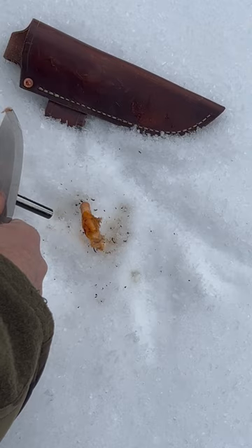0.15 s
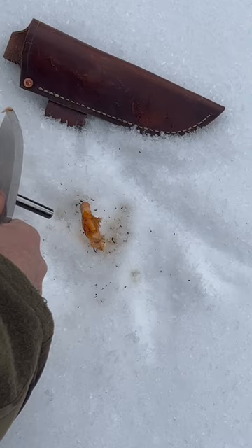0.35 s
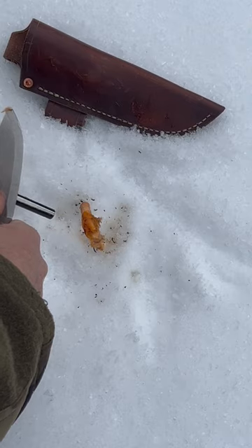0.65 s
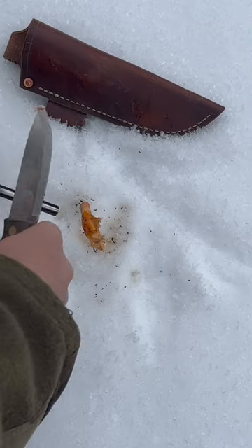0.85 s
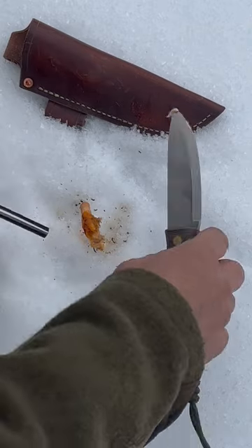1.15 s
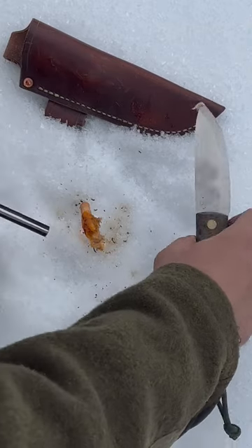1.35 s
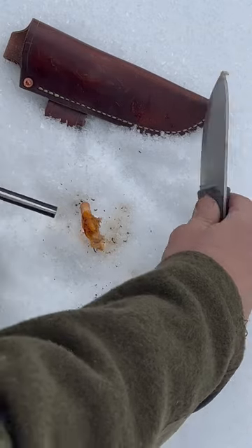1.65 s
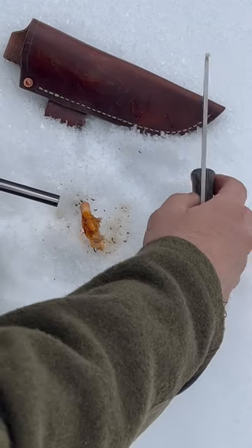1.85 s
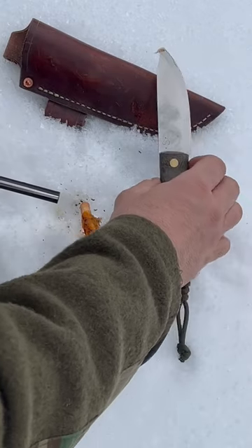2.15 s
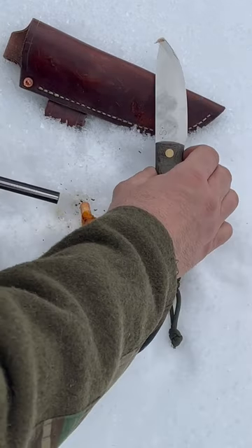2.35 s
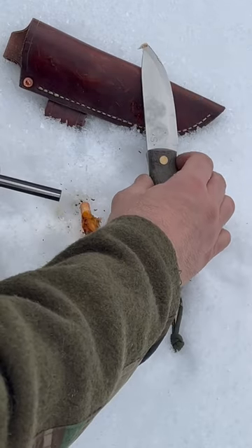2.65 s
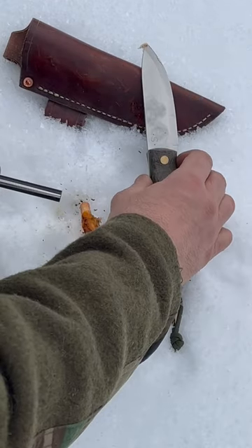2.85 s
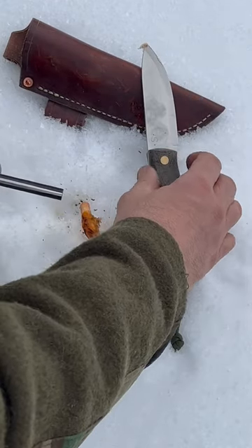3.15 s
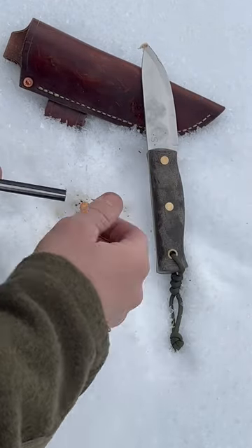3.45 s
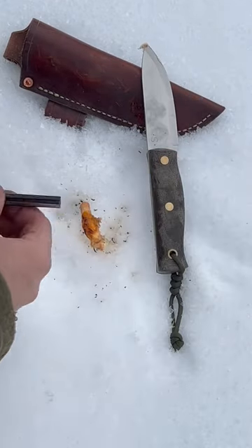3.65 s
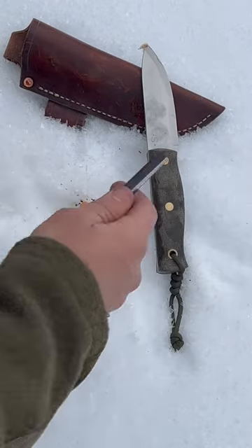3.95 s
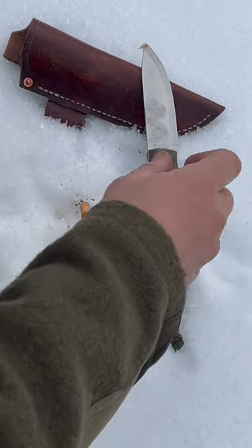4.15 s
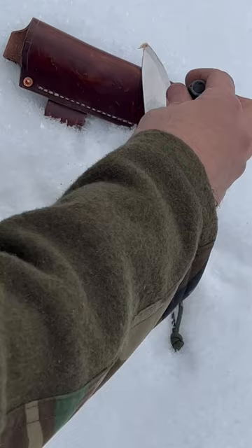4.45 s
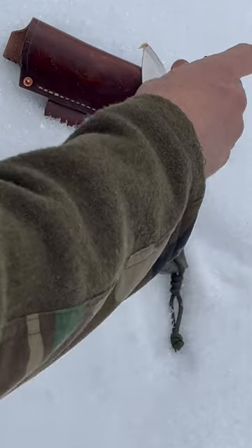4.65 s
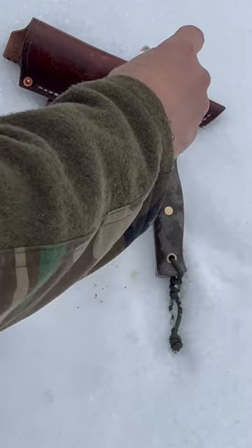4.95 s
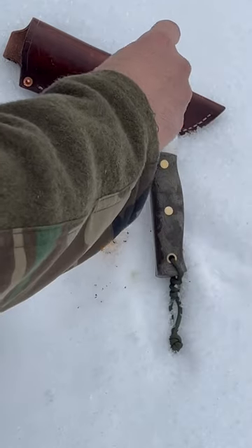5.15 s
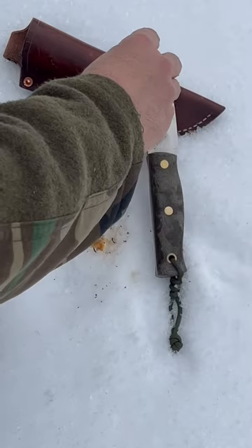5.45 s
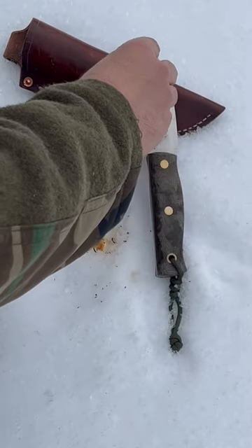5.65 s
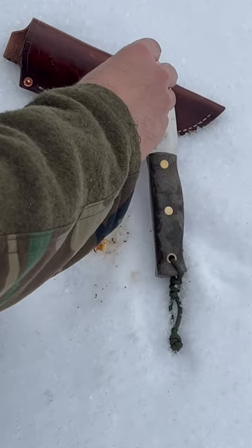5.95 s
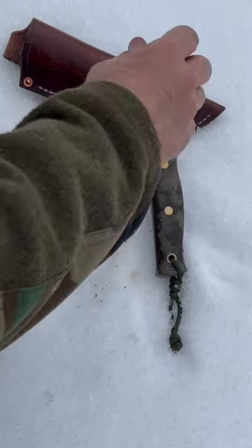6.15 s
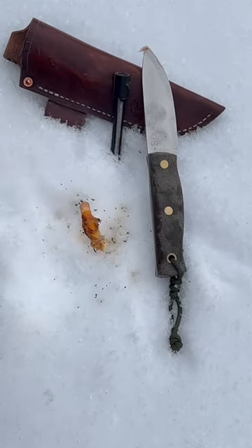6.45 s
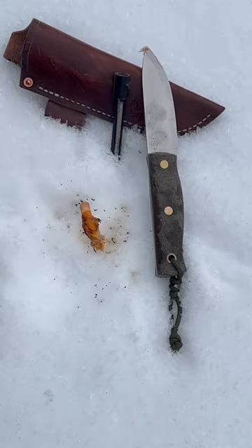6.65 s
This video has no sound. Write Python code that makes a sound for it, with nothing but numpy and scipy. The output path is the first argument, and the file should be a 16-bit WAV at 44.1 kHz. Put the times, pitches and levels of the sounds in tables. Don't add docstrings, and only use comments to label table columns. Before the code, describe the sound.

A quiet, close, dry outdoor sound on snow, with faint distant hiss throughout. From 0 to 2.2 seconds, sparse crisp cracks and ticks of snow crust come over thin sleeve rustle, densest around 0.3-0.9 and 1.5-1.8. At about 2.25 a knife touches leather: a short, damped double clack, with a crust crack and small bump near 2.36 and a tiny scrape at 2.5. From 2.8 low wind rumbles on the microphone, swelling into deep, soft buffets at 3.5-4.4, strongest around 4.2, while the stiff sleeve rustles and snaps. As the wind falls, a metal rod lands at 4.78 with a hard, bright clink and quick bounces, ringing slightly longer than the knife. Crisp cloth rustle and seam snaps follow; a hand bumps the snow with sharp crackle and soft thud at 5.88. Rustling thins, with a last snap and light touch at 6.72.

```python
import sys
import numpy as np
from scipy import signal
from scipy.fft import rfft, irfft
from scipy.io import wavfile
from scipy.ndimage import map_coordinates

SR = 44100
rng = np.random.default_rng(int(sys.argv[2]) if len(sys.argv) > 2 else 0)


def output_pcm(signal):
    pcm = np.clip(np.atleast_2d(signal).T, -1, 1) * 32767
    wavfile.write(sys.argv[1], SR, np.round(pcm).astype(np.int16))


def invert_db(x):
    u = np.asarray(x, float) / 20
    return 10 ** u


N = 299880
HZ = np.fft.rfftfreq(N, 1 / SR) + 1e-3

# (time [s], rustle level [dB], sleeve turned away [0-1])
CLOTH = [(0.0, -71.5, 0.17), (0.6, -75, 0.16), (1.2, -72.5, 0.22), (1.9, -78.5, 0.09), (2.1, -89, 0.14),
         (2.62, -85, 0.23), (2.92, -102, 0), (3.0, -72, 0.34), (3.25, -72.5, 0.27), (3.52, -63.5, 0.06),
         (4.3, -70.5, 0.61), (4.7, -64.5, 0.69), (4.95, -61, 0.18), (5.3, -69.5, 0.21), (5.7, -62.5, 0.13),
         (5.88, -74.5, 0.05), (6.25, -73.5, 0.37), (6.5, -64.5, 0)]
# (frequency [Hz], level per Hz [dB])
BRIGHT = [(1500, -17), (3000, -5.5), (5700, -0.5), (6900, -4), (7600, 0), (9000, -4), (10500, -39.5),
          (13000, -76)]
DULL = [(250, -1), (600, -7), (1200, -2), (2500, -2.5), (3100, -10), (5000, -25), (10000, -18)]
TOP = [(8000, -24), (9500, 4.5), (11200, 5.5), (13000, -3.5), (14800, 3.5), (15700, -2.5), (16100, -12)]


def handling():
    # (time [s], level [dB])
    knife_hits = [
        (2.2465, -31.5),
        (2.2479, -30),
        (2.2512, -46),
        (2.258, -40.5),
    ]
    rod_hits = [
        (4.7801, -27.5),
        (4.7816, -33.5),
        (4.7838, -37.5),
        (4.7932, -37.5),
    ]
    # (frequency [Hz], level [dB], time to fall 60 dB [s])
    knife = [(416, -9, 0.021), (642, -18.5, 0.065), (740, -15, .015), (960, -5, 0.011),
             (1565, -15.5, 0.027), (1660, -11.5, 0.017), (2620, -31, 0.021), (3170, -13, 0.011),
             (3980, -22, 0.021), (4830, -19, 0.0074)]
    rod = [(340, -21.5, 0.26), (416.5, -15, 0.13), (1000, -13.5, 0.05), (1694, -10, 0.026),
           (2786, -7.5, 0.032), (2923, -1, 0.033), (4200, -9.5, 0.0062), (4780, -10.5, 0.014),
           (5740, -9, 0.026), (6900, -38, .01)]
    # (time [s], level [dB])
    slide = [
        (2.483, -100),
        (2.49, -72.5),
        (2.5, -81),
        (2.56, -82),
        (2.575, -100),
    ]
    # (time [s], level [dB], frequency [Hz], time to fall 60 dB [s])
    bumps = [
        (2.363, -44.5, 180, 0.014),
        (5.8846, -43.5, 193, 0.046),
        (5.8853, -45, 340, 0.022),
        (6.7242, -49, 380, 0.046),
        (6.7262, -51, 650, 0.018),
        (5.897, -42.5, 140, 0.034),
    ]
    slide_db, = in_time(slide)
    drag = invert_db(slide_db + drift(60)) * rng.standard_normal(N)
    blade = sum(ring(drag, hz, t60 / 2) for hz, db, t60 in knife[4:])
    dragged = low_pass(invert_db(17.5) * drag + invert_db(-16) * blade, 8500)
    thuds = sum(ring(clicks([(s, db)]), hz, t60) for s, db, hz, t60 in bumps)
    return laid_down(knife_hits, knife, 0.2) + laid_down(rod_hits, rod, 0.21) + dragged + thuds


def laid_down(hits, modes, soft):
    out = np.zeros(N)
    for k, (hz, db, t60) in enumerate(modes):
        uneven_db = [0, 1.2] * rng.standard_normal((len(hits), 2))
        blows = clicks(np.array(hits) + uneven_db)
        sign = (-1) ** (k // 2)
        out += sign * invert_db(db) * ring(blows, hz, t60)
    return signal.lfilter([(1 - soft) ** 2], [1, -2 * soft, soft ** 2], out)


def snaps():
    rise_ms = 0.34
    first_break = 1.58
    length = 1500
    bright, dull = np.zeros((2, N + length))
    t = np.arange(length) / SR
    for (s, db, dull_db, t60_ms), noise in zip(all_snaps(), rng.standard_normal((230, length))):
        at = round((s - .0001) * SR)
        rise = np.minimum(1e3 * t / rise_ms + 0.5, 1)
        fall = invert_db(-60e3 * t / max(t60_ms - 1.2, 1)) + invert_db(-25 - 60 * t / 0.048)
        crack = noise * rise * fall
        crack[2] += first_break * np.sign(noise[-1])
        middle = np.convolve(crack[:30], [0.79, 0.22, -0.22, -0.79])
        crack /= np.sqrt(np.mean(middle ** 2))
        bright[at:at + length] += invert_db(db - 5.5) * crack
        dull[at:at + length] += invert_db(db + dull_db - 5.0) * crack
    top = invert_db(-1.4 + 0.6 * arm()[2]) * bright[:N]
    thin = signal.lfilter([1, -1], [1, -.88], dull[:N])
    return colour(bright[:N], BRIGHT) + colour(top, TOP) + colour(thin, DULL)


def all_snaps():
    # (time [s], peak level [dB], dull part against it [dB])
    crust = [(0.0876, -53, -30), (0.2166, -50, -24), (0.2525, -44.5, -32), (0.3251, -35.5, -19),
             (0.4773, -45, -0.5), (0.487, -43.5, -6.5), (0.598, -34.5, -19), (0.647, -42, -25),
             (0.714, -50.5, -27), (0.818, -45, -26), (0.8299, -44.5, -24), (0.8826, -48, 1.5),
             (1.0772, -49.5, -22), (1.1645, -43, -31), (1.212, -50, -16), (1.2177, -42, -10),
             (1.3463, -48, -27), (1.5269, -38, -21), (1.5515, -38.5, -19), (1.6086, -42, -9),
             (1.6857, -35.5, -16), (1.7547, -46.5, -15), (1.8987, -49.5, -28), (2.187, -55, -15),
             (2.3113, -39, -12.5), (2.3598, -33.5, -4.5), (2.43, -52.5, -25), (2.4796, -47.5, -22),
             (2.6745, -51, -19), (2.7095, -53, -17)]
    # (time [s], peak level [dB], dull part against it [dB])
    seams = [(2.98, -44, -5.5), (3.0078, -41, -18), (3.0741, -48.5, -1.5), (3.0968, -47, 1),
             (3.101, -41, -11), (3.138, -42.5, -2), (3.1619, -42.5, -5), (3.181, -42.5, -15),
             (3.434, -37, 0), (3.5559, -33, -16), (3.577, -39.5, -25), (3.5959, -37, -14),
             (3.6616, -46.5, -17), (3.7615, -41.5, -11), (4.0163, -55, 16.5), (4.2387, -44, -1),
             (4.9101, -56.5, 21.5), (5.247, -41, 1.5), (5.326, -42.5, -7), (5.341, -43.5, -6),
             (5.399, -36.5, -10), (5.4058, -36.5, -5), (5.7392, -43, -12), (5.8741, -29, -13),
             (5.8788, -38.5, -3.5), (5.8955, -33.5, -13), (5.9631, -46, -8), (6.433, -38, -20),
             (6.6464, -59.5, -34.5), (6.7226, -30, -12.5)]
    # (time [s], peak level [dB], time to fall 60 dB [ms])
    rubs = [(0.0183, -57.5, 14), (3.3857, -43, 26), (3.513, -39.5, 49), (3.5321, -42.5, 39),
            (3.6013, -37.5, 7.7), (4.4052, -43, 5.7), (4.523, -43, 6.1), (4.5836, -51, 27),
            (4.6714, -53, 6.9), (4.756, -48.5, 29), (5.114, -52, 21), (6.5696, -63, 3.6), (4.9016, -50, 8),
            (4.949, -52, 12), (5.0019, -46, 7), (5.071, -44.5, 21), (5.1703, -42.5, 24),
            (5.5813, -46.5, 18), (5.68, -45, 16), (6.3267, -49, 19), (6.5238, -42, 8.3)]
    crust_t60_ms, seam_t60_ms, rub_dull_db = 2.8, 4, -5
    strays_per_s, stray_db, stray_spread_db, stray_dull_db = 11, 14.5, 2.5, -7
    rows = [(*row, crust_t60_ms) for row in crust]
    rows += [(*row, seam_t60_ms) for row in seams]
    rows += [(s, db, rub_dull_db, t60_ms) for s, db, t60_ms in rubs]
    gap, size, body = rng.random((150, 3)).T
    s = np.cumsum(-np.log(gap) / strays_per_s)
    rustle_db = np.interp(s, *np.transpose(CLOTH)[:2])
    db = rustle_db + stray_db + stray_spread_db * np.minimum(-np.log(size), 2)
    strays = zip(s, db, stray_dull_db + 10 * (body - .5), seam_t60_ms * (.5 + body))
    return rows + [row for row in strays if row[0] < N / SR]


def cloth():
    rustle_db, dull_db, top_db = arm()
    rustle_db = rustle_db + 1.0 * drift(6)
    clump_db = 2.36 * drift(54)
    born = rng.random(N) < 400 * invert_db(clump_db) / SR
    sizes = invert_db(3.5 + 1.46 * np.minimum(rng.exponential(1, N), 3.0))
    grains = signal.lfilter([1], [1, -invert_db(-60 / (0.0049 * SR))], born * sizes)
    envelope = .5 * invert_db(clump_db) + grains
    bright, dull = envelope * invert_db(rustle_db - 1.82) * rng.standard_normal((2, N))
    hiss = colour(bright, BRIGHT)
    hiss = hiss + colour(invert_db(dull_db - 3.8) * dull, DULL)
    hiss = hiss + colour(invert_db(top_db - 3.2) * bright, TOP)
    return low_pass(hiss, 15800)


def arm():
    # (time [s], half length [s], change of rustle level [dB])
    swishes = [(0.16, 0.18, -7.5), (0.298, .05, 3.5), (0.733, 0.087, 0.5), (0.966, .08, -3.5),
               (1.388, 0.052, 4), (1.564, 0.053, 4), (2.276, 0.094, 13), (2.714, 0.037, 11),
               (3.38, 0.13, 6.5), (3.917, 0.065, 0), (4.537, 0.076, 4), (4.869, 0.022, -9),
               (5.367, 0.059, 5.5), (5.572, 0.08, 3.5), (6.003, 0.11, 3.5), (6.437, .06, 0.5),
               (6.604, 0.13, -6.5), (6.743, 0.031, -1)]
    dull_facing_db, dull_turn_db = -5, 18.5
    top_facing_db, top_turn_db = 4, -24.5
    rustle_db, turned = in_time(CLOTH)
    t = np.arange(N) / SR
    for s, half_s, db in swishes:
        rustle_db = rustle_db + db * np.exp(-((t - s) / max(half_s, .02)) ** 2)
    return rustle_db, dull_facing_db + dull_turn_db * turned, top_facing_db + top_turn_db * turned


def wind():
    # (time [s], rumble level [dB])
    gusts = [(0.0, -90), (0.11, -53), (0.28, -73), (0.5, -60), (0.72, -72.5), (0.85, -55.5), (0.93, -70),
             (2.56, -70), (2.8, -49.5), (3.33, -65.5), (3.6, -44), (3.84, -43.5), (4.02, -36), (4.13, -58),
             (4.2, -32), (4.68, -62.5), (6.04, -69.5), (6.5, -58.5)]
    # (time [s], peak level [dB], frequency [Hz])
    eddy_rows = [(2.774, -39.5, 62), (3.544, -31.5, 63.6), (3.686, -31.5, 63), (3.933, -28.5, 93.5),
                 (4.039, -24.5, 74), (4.205, -21, 62), (4.3, -27, 85), (4.4, -32, 77.5), (2.491, -62, 193),
                 (3.111, -52, 188), (3.33, -53, 168), (3.54, -46, 160), (3.699, -39.5, 149),
                 (3.939, -54, 141), (4.84, -48, 46.3), (5.27, -54, 55), (6.391, -44, 69), (6.751, -44, 60)]
    # (frequency [Hz], level per Hz [dB])
    rumble_tone = [(15, -64), (28, -32), (45, 17), (80, 13), (110, 0), (200, -54), (500, -83)]
    buffet_tone = [(60, -37), (110, 9), (160, -2), (220, -18), (350, -47), (800, -72)]
    flutter_tone = [(140, -18), (230, 2.5), (400, -2), (600, -10.5), (1200, -10.5), (2600, -9.5),
                    (5000, -26)]
    buffet_calm_db, buffet_gust_db, buffet_follows = -73.5, -54.5, 2.37
    flutter_calm_db, flutter_arm_db = -84.5, -9
    gust_db, = in_time(gusts)
    white = rng.standard_normal((3, N))
    lumps_db = 2.5 * drift(20)
    rumble = colour(white[0], rumble_tone) * invert_db(gust_db + lumps_db - 3.2)
    buffet = invert_db(buffet_calm_db) + invert_db(buffet_gust_db + buffet_follows * (gust_db + 39.5))
    buffet = buffet * colour(white[1], buffet_tone) * invert_db(-5.5 + 8.2 * drift(31))
    flutter = invert_db(flutter_calm_db) + invert_db(flutter_arm_db + arm()[0])
    flutter = flutter * colour(white[2], flutter_tone) * invert_db(1.5 + 3.7 * drift(27))
    eddies = sum(ring(ring(clicks([(s, db - 41.5)]), hz, 0.047), hz, 0.067) for s, db, hz in eddy_rows)
    return rumble + buffet + flutter + eddies


def far_hiss():
    # (frequency [Hz], level per Hz [dB])
    far_tone = [(180, -25), (300, -2), (650, -6), (1130, -15), (2360, -7), (3100, -16), (7000, -23),
                (12500, -48)]
    return invert_db(-82.5 + 1.9 * drift(3)) * colour(rng.standard_normal(N), far_tone)


def sleeve_echoes(x):
    # (time [s], extra path [ms], strength [0-1])
    hand_echo = [(0, 0.18, 0.2), (.9, 0.17, 0.13), (1.2, 0.15, 0), (2.9, 0.2, 0.04), (3.4, 0.11, 0.3),
                 (3.8, 0.19, 0), (4.9, 0.11, 0.18), (6.8, 0.14, 0.22)]
    snow_echo = [(3.6, .42, .1), (3.85, .42, .35), (4.15, .5, .4), (4.4, .72, .33), (4.7, .6, .25),
                 (5.0, .6, .15)]
    return echoed(echoed(x, hand_echo), snow_echo)


def echoed(x, path):
    path_ms, strength = in_time(path)
    echo = map_coordinates(x, [np.arange(N) - path_ms * SR / 1000], order=3)
    return (x + np.clip(strength, 0, 1) * echo) / np.sqrt(1 + strength ** 2)


def ports(x, balance):
    # (frequency [Hz], level [dB])
    apart = [(60, -11), (300, -14), (700, -5), (2000, -17.5), (3200, -5.5), (6000, -15.5), (9000, -14.5),
             (16000, -14.5)]
    # (frequency [Hz], gain [dB])
    left_gain = [(60, .6), (700, 2.0), (1700, 0), (15000, 0)]
    # (frequency [Hz], phase lead [radians])
    left_lead = [(0, 0), (2500, 0), (3400, .35), (5500, 0), (7900, .3), (8700, -.3), (9500, -2.0),
                 (15400, -12.6)]
    side = rfft(x * balance) * invert_db(at_hz(apart))
    lead = np.interp(HZ, *np.transpose(left_lead))
    half_gain_db = at_hz(left_gain) / 2
    left = (rfft(x) + side) * invert_db(half_gain_db)
    right = (rfft(x) - side) * invert_db(-half_gain_db) * np.exp(-1j * lead)
    return irfft(np.array([left, right]), N)


def rms_one(x):
    return x / np.sqrt(np.mean(x ** 2) + 1e-20)


def in_time(rows):
    s, *columns = np.transpose(rows)
    return [np.interp(np.arange(N) / SR, s, c) for c in columns]


def at_hz(points):
    hz, db = np.transpose(points)
    return np.interp(np.log(HZ), np.log(hz + 1), db)


def colour(x, points):
    return irfft(rfft(x) * rms_one(invert_db(at_hz(points))), N)


def drift(per_s):
    r = np.exp(-2 * np.pi * per_s / SR)
    wander = signal.lfilter([1], [1, -2 * r, r * r], rng.standard_normal(N + SR))
    return rms_one(wander[SR:])


def clicks(rows):
    s, db = np.transpose(rows)
    out = np.full(N, 1e-18)
    np.add.at(out, (s * SR).astype(int), invert_db(db))
    return out


def ring(x, hz, t60):
    r = invert_db(-60 / (t60 * SR))
    w = 2 * np.pi * hz / SR
    return signal.lfilter([0, np.sin(w)], [1, -2 * r * np.cos(w), r * r], x)


def low_pass(x, hz):
    return signal.sosfilt(signal.cheby2(12, 60, hz * 1.02, fs=SR, output="sos"), x)


def scene():
    spread = wind() + sleeve_echoes(cloth() + snaps()) + far_hiss()
    return ports(handling(), 0.22) + ports(spread, drift(23.0))


def top_cut(x):
    return signal.sosfilt(signal.butter(12, 16940, fs=SR, output="sos"), x)


def record(dry):
    mix = low_pass(dry, 16600)
    return top_cut(mix)


dry = scene()
out = record(dry)
output_pcm(out)
```